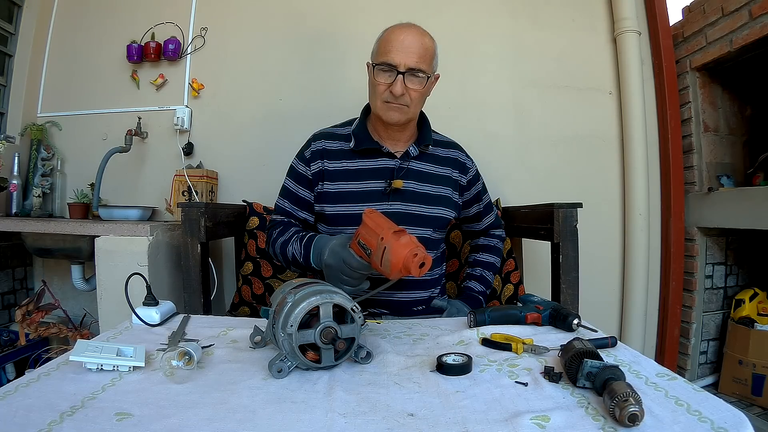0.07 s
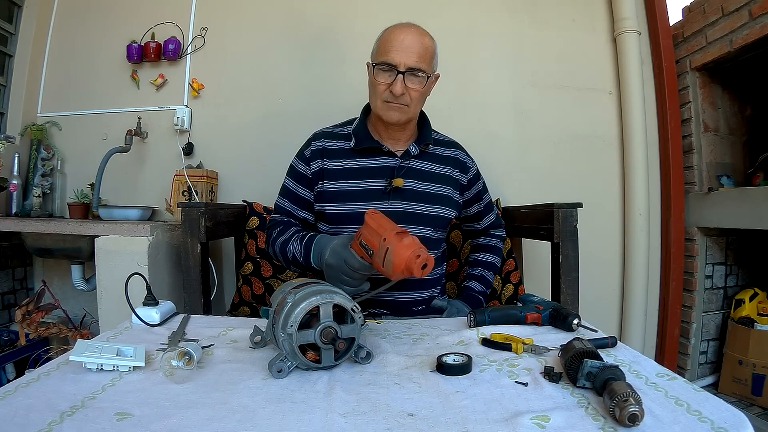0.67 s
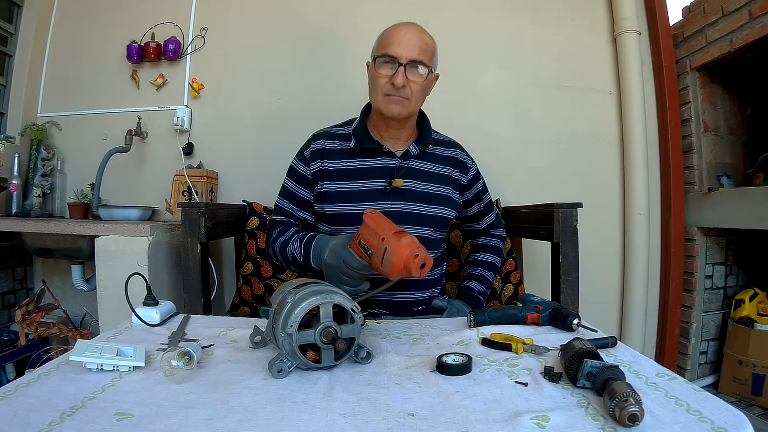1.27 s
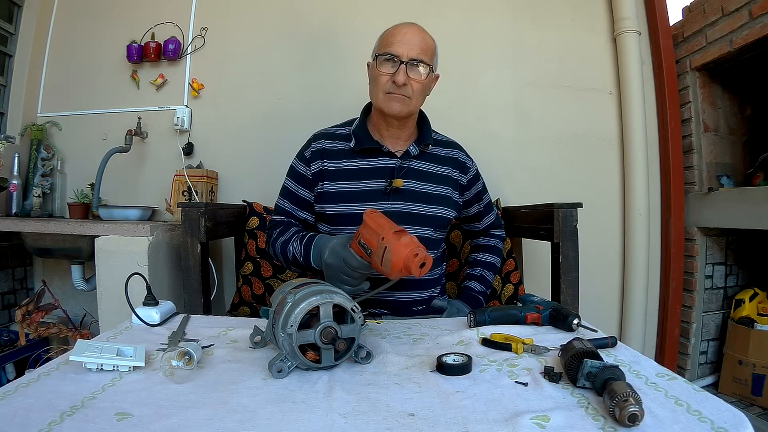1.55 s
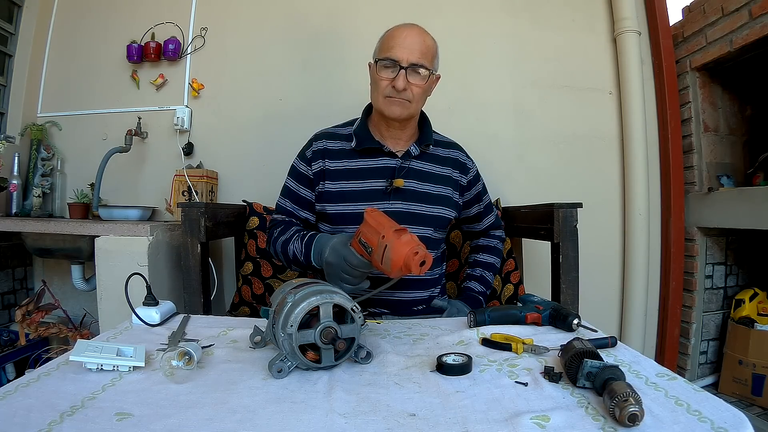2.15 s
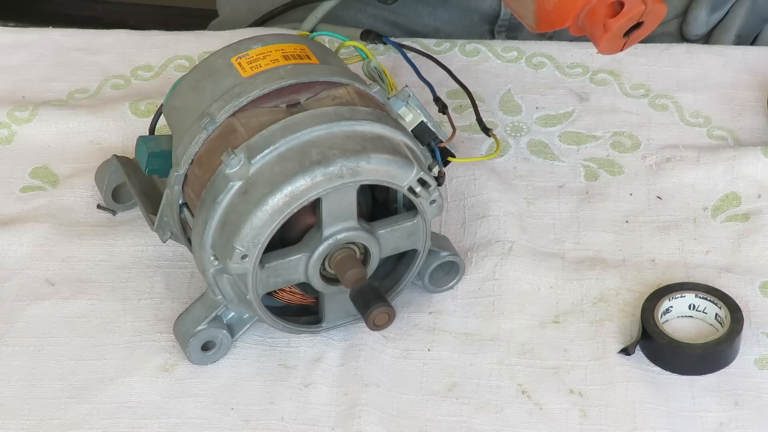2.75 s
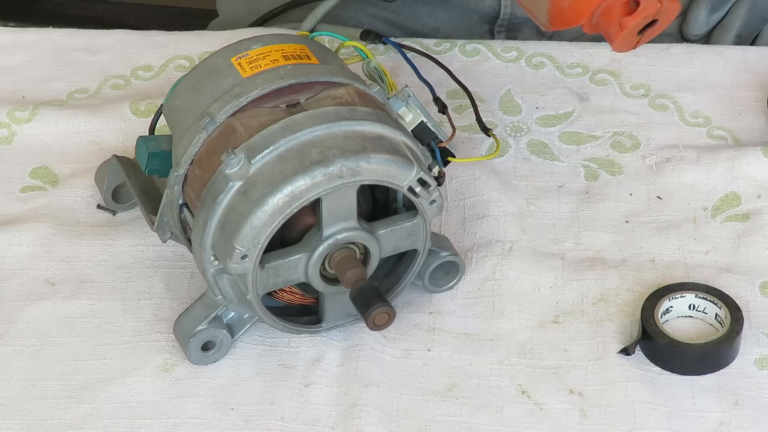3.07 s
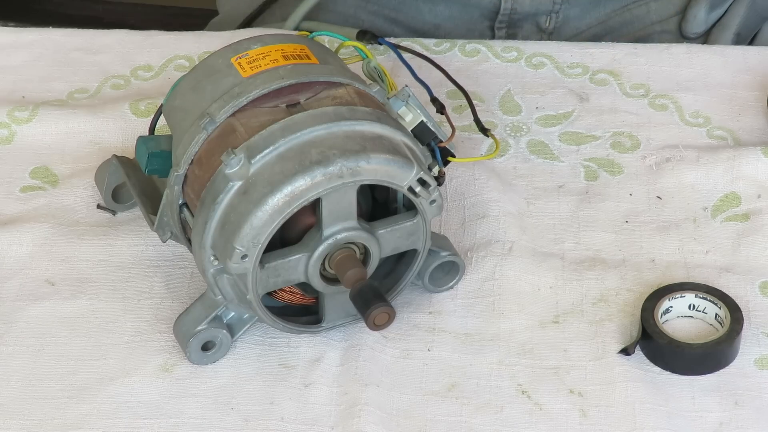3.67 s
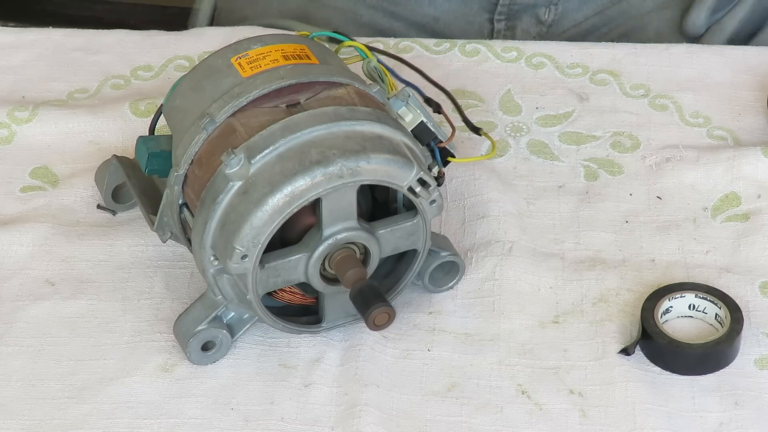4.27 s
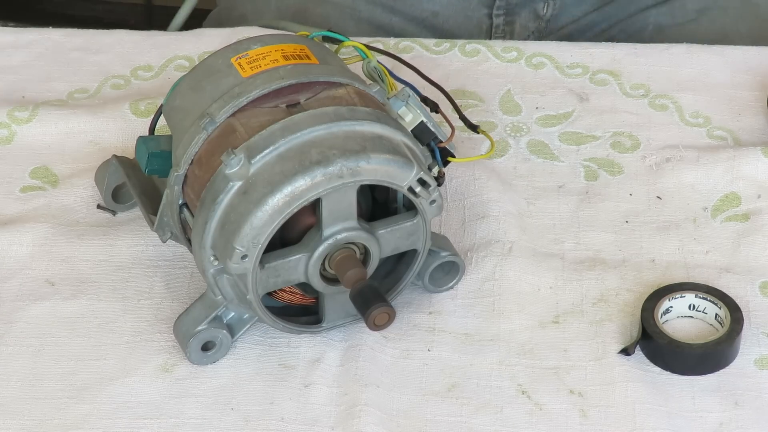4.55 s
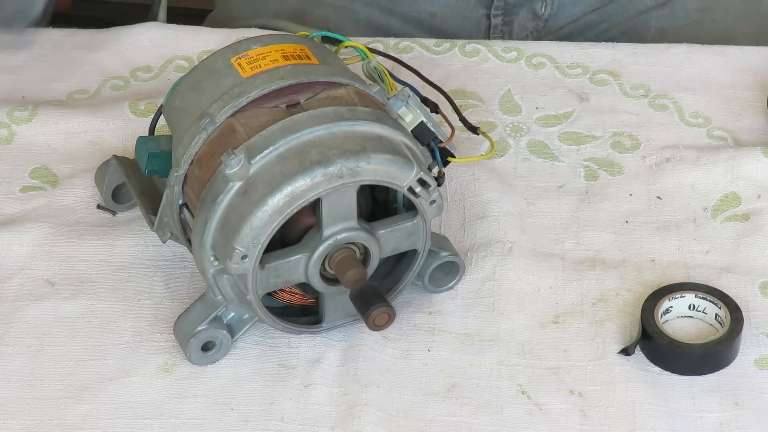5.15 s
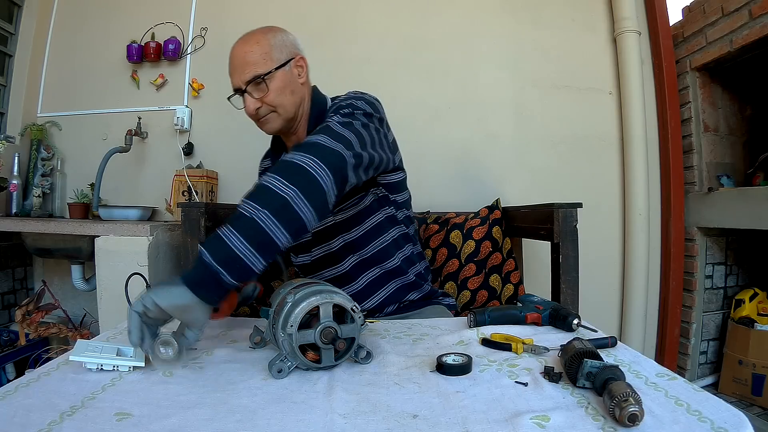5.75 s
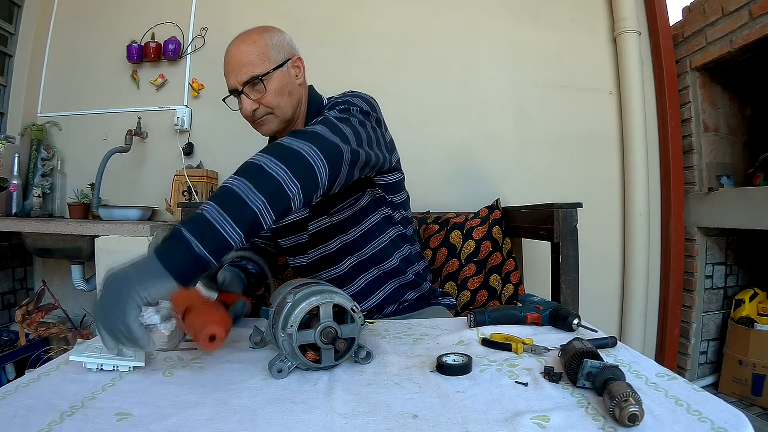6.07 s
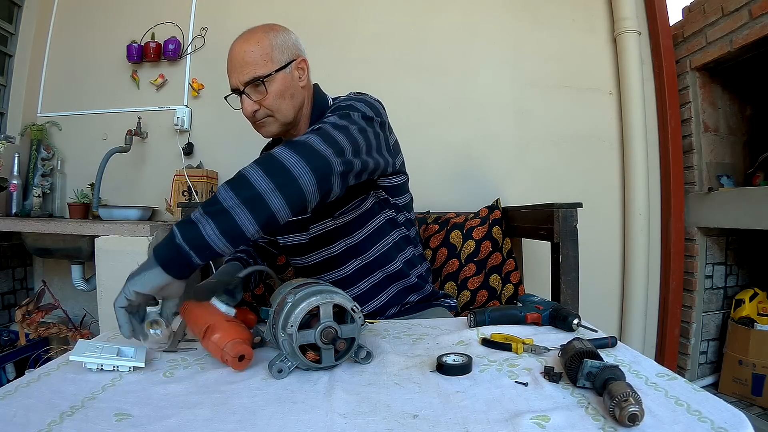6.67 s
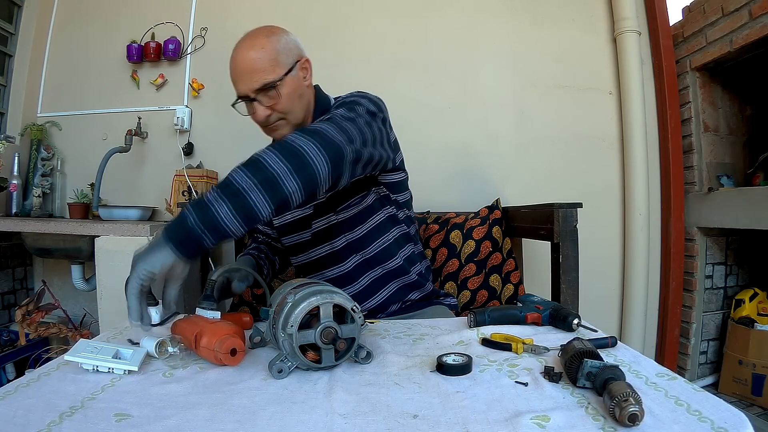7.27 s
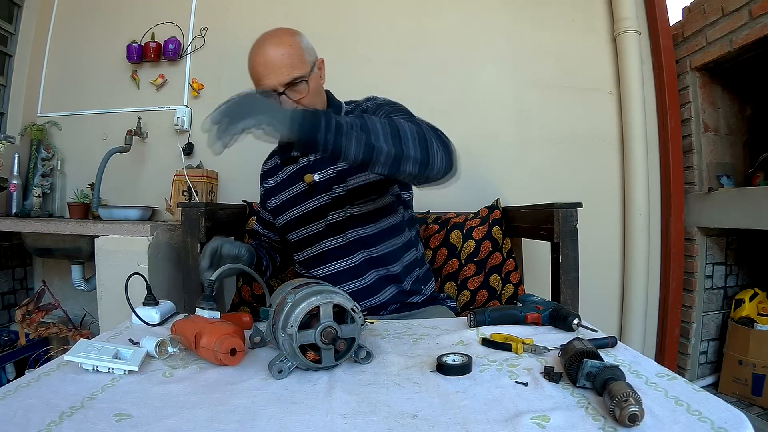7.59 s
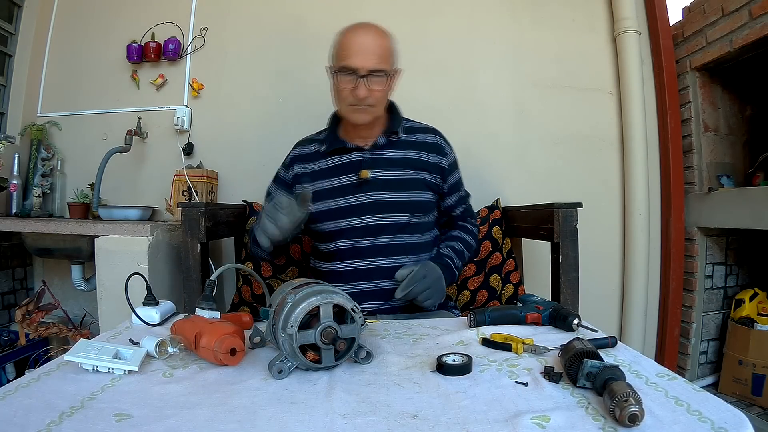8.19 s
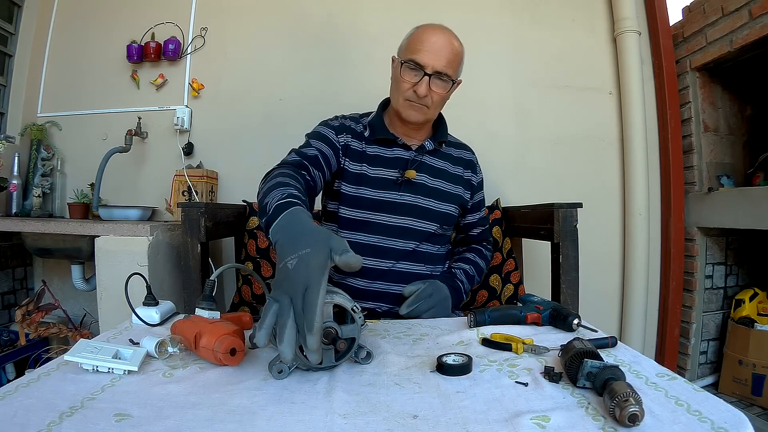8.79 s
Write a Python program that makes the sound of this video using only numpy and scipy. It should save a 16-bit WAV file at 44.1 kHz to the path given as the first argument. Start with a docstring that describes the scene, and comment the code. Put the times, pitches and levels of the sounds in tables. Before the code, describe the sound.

A bare washing-machine motor runs on a cloth-covered workbench, its hum and high whine rising in pitch over a hiss of bearings and brushes. After about three seconds the power cuts and it coasts, the pitch sinking slowly while the whirring grows raspier. A few dull knocks come as a power tool and a plug are handled on the bench. One close microphone picks it up.

```python
"""A hum and a rising whine, close by on one microphone: a bare brushed washing-machine motor running on
a cloth-covered workbench. It speeds up, loses its power at 2.8 s and coasts down. The unbalanced rotor
makes the bench hum, the brushes whine over 36 commutator bars, bearings and brushes hiss in the casing.
While it coasts, a power tool and a plug are handled on the bench with a few dull knocks."""
import sys
import numpy as np
from scipy import signal
from scipy.fft import rfft, irfft
from scipy.io import wavfile

SR = 44100
rng = np.random.default_rng(int(sys.argv[2]) if len(sys.argv) > 2 else 0)


def int16_out(signal):
    """Quantize to a 16-bit WAV file."""
    q = np.round(np.clip(np.atleast_2d(signal).T, -1, 1) * 32767)
    wavfile.write(sys.argv[1], SR, q.astype(np.int16))


N = 388962
TIME = np.arange(N) / SR
BIN_HZ = np.maximum(np.arange(N // 2 + 1) * SR / N, 1)
MAINS_HZ, POWER_OFF_S, BARS = 50, 2.82, 36

# stages of the speed: t/s, turn rate then/Hz, turn rate it heads for/Hz, time constant/s
LOW_POWER = (0, 168.8, 204.3, .824)
HIGH_POWER = (.6, 190.7, 334.2, 1.662)
COASTING = (POWER_OFF_S, 297.65, -106.2, 19.07)   # heads below zero: dry friction brakes even a slow rotor
# current in the windings while the power is on: t/s, share of full current
WINDING_CURRENT = [(0, 0.36), (.58, 0.2), (.64, 0.6), (1.3, 0.32), (2.1, 0.4), (2.75, 0.07)]
# unbalance shaking the bench once a turn: t/s, level/dB
UNBALANCE = [(0.0, -20.5), (0.1, -19.5), (0.22, -23.5), (0.66, -22.5), (0.76, -18), (1.08, -16.5),
             (1.2, -13), (2.09, -11), (3.22, -10.5), (4.3, -13.5), (4.59, -11), (4.86, -13.5), (5.28, -12),
             (6.41, -23.5), (7.1, -20), (7.61, -22), (7.86, -16), (8.82, -23)]
# response of feet and bench to rocking twice a turn: f/Hz, level/dB
ROCKING_RESPONSE = [(340, -38.5), (385, -37.5), (403, -46.5), (420, -34), (455, -36.5), (490, -37),
                    (508, -25), (516, -34), (528, -26), (543, -28.5), (553, -41.5), (569, -24.5),
                    (583, -29.5), (595, -23.5)]
# shaking at orders (multiples of the turn rate) 3 and 4:
# order, boost at full current/dB, [f/Hz, level against the low bearing noise/dB]
OVERTONES = [(3, 4.5, [(500, -23), (590, -15.5), (640, -9), (740, -7), (770, -13.5), (820, -5.5),
             (890, -3.5)]), (4, 10.5, [(670, -10), (800, -10.5), (870, -5.5), (1040, -7), (1100, -10),
             (1190, -5.5)])]
# weaker overtones of the shaking: order, level against the low bearing noise/dB
FAINT_OVERTONES = [(5, -12.5), (6, -40), (7, -14.5), (8, -15.5), (11, -25)]
# tones of the 18 rotor slots, the bars and their side tones, with the casing modes that each drives:
# order, dB gained per dB of chatter, [f/Hz, width/Hz, level at the hardest chatter/dB]
WHINE_TONES = [(13, 1.8, [(2815, 126, -33), (3330, 300, -37)]), (17, 0.51, [(3000, 160, -41),
               (3300, 160, -38), (4070, 140, -37), (4850, 350, -40)]), (18, 0.57, [(3150, 80, -37),
               (3290, 220, -39.5), (3840, 390, -37.5), (4190, 150, -38.5), (4500, 150, -47.5),
               (4897, 156, -29), (5220, 240, -30.5)]), (20, 0.91, [(3670, 200, -41), (4630, 190, -45),
               (5100, 280, -36.5), (5600, 180, -38)]), (27, 1.7, [(4950, 250, -46), (5580, 140, -41),
               (6220, 150, -36), (6650, 350, -44)]), (35, 0.89, [(8100, 170, -38), (9340, 430, -36),
               (10300, 300, -39)]), (36, 0.46, [(6630, 300, -36), (7440, 98, -31.5), (8180, 1100, -34),
               (8720, 250, -30.5), (9120, 230, -30.5), (9710, 170, -29.5), (10680, 100, -42)]),
               (37, 0.85, [(6820, 170, -35.5), (7690, 300, -33), (9000, 130, -34), (9510, 290, -35),
               (10850, 300, -37)]), (53, 1.3, [(12200, 800, -53), (13900, 300, -56)]),
               (55, 1.4, [(12600, 600, -60)]), (57, 1.4, [(12200, 800, -59)]),
               (70.8, 1, [(14000, 2500, -61)]), (72, .5, [(13400, 1500, -53), (14900, 600, -61)]),
               (73, 1, [(14000, 2500, -63)])]
# how hard the brushes chatter; they ride lightly around top speed and bite again at 4.1 s: t/s, level/dB
CHATTER_STRENGTH = [(0, -48), (.9, -42.5), (1.9, -50), (2.8, -55), (4.0, -56.5), (4.25, -41), (5.8, -37.5),
                    (6.3, -35), (7.1, -34.5), (8.82, -39)]
# chatter over uneven bars, most near multiples of the slot rate: order, relative level/dB
CHATTER_SPECTRUM = [(14, -7), (16, -6.5), (19, -12), (21.5, -10), (24, -17), (25, -19), (28, -14),
                    (34, -14.5), (42, -17.5), (45, -27.5), (48, -37), (59, -29)]
# balls passing flaws in the races: order, relative level/dB
BALL_TONES = [(13.9, -5), (21.3, -10)]
# resonances of the casing: f/Hz, width/Hz, gain/dB
CASING_MODES = [(2880, 88, -24), (3280, 130, -3.5), (3810, 440, 0), (4930, 490, -0.5), (5500, 230, 2),
                (6700, 350, -3.5), (7970, 770, 2), (9229, 860, 3.5), (13040, 990, 7.5), (14200, 900, -8)]
# colour of the rolling and rubbing noise: f/Hz, relative level/dB
FRICTION_SPECTRUM = [(300, -8), (550, -0.5), (850, 2.7), (1150, -4), (1450, -1.5), (1950, -7.5),
                     (2450, -12.5), (3250, -5), (4350, -14.5), (5000, -12.5), (7500, -23.5), (9600, -29.5),
                     (11200, -36), (15500, -43.5)]
# friction before the band gains: t/s, low bearing/dB, high bearing/dB, end-shield ring/dB, brush rub/dB
FRICTION_LEVELS = [(0.0, -37, -36.5, -40.5, -42), (0.47, -36, -36, -38.5, -44),
                   (0.81, -34.5, -32.5, -36.5, -44.5), (1.08, -32, -32.5, -36, -42.5),
                   (1.5, -31.5, -30, -32, -37.5), (1.94, -29.5, -28, -29.5, -36),
                   (2.46, -31.5, -31.5, -32.5, -39.5), (2.82, -32, -31, -32, -39),
                   (3.61, -32, -31.5, -32.5, -40), (4.1, -29.5, -29.5, -31, -34),
                   (4.3, -28.5, -26.5, -29.5, -32.5), (5.26, -29.5, -27.5, -32, -33.5),
                   (5.65, -27.5, -29, -28, -32.5), (6.34, -29.5, -28.5, -27, -32.5),
                   (7.0, -28, -29.5, -27.5, -34.5), (8.11, -32.5, -31.5, -33.5, -37.5),
                   (8.4, -32, -32.5, -32.5, -35), (8.82, -32.5, -32, -36.5, -38)]
FRICTION_GAINS_DB = (-0.5, -0.5, -2, -3.5)
FRICTION_EDGES_HZ = (150, 1100, 2400, 4200, 6500, 17000)   # those four bands, then the brush hiss
# things set down on the bench: t/s, peak level/dB, contact cut-off/Hz
KNOCKS = [(4.735, -34, 80), (4.76, -35, 100), (6.235, -35, 250), (6.468, -24, 200), (6.497, -29, 200),
          (7.356, -33, 400), (7.385, -34, 250)]
# modes of the bench: f/Hz, relative level/dB, t60/s
BENCH_MODES = [(55, -12, .2), (112, -1.5, 0.12), (148, -3.5, 0.18), (177, 7.5, .25), (260, -6, .12),
               (332, 10, .12)]


def from_db(db):
    """Decibels to gain."""
    return np.exp(np.asarray(db) * (np.log(10) / 20))


def unit_rms(x):
    """Scale to an rms of 1."""
    return x / np.sqrt(np.mean(x ** 2) + 1e-20)


def in_time(rows):
    """One curve per column, straight between the rows."""
    times, *columns = np.transpose(rows)
    return [np.interp(TIME, times, column) for column in columns]


def spectrum_db(points, hz):
    """Read a spectrum in dB on a log-frequency axis."""
    known_hz, db = np.transpose(points)
    return np.interp(np.log(hz), np.log(known_hz), db)


def noise(gain):
    """Noise of rms 1, shaped by a gain per frequency bin."""
    return unit_rms(irfft(rfft(rng.standard_normal(N)) * gain, N))


def drift(rate):
    """A random wander of rms 1 with about `rate` swings a second."""
    grid = np.linspace(0, N / SR, 4096)
    hz = np.arange(len(grid) // 2 + 1) / grid[-1]
    slow = irfft(rfft(rng.standard_normal(len(grid))) / (1 + (hz / rate) ** 2))
    return np.interp(TIME, grid, unit_rms(slow))


def tone(angle, order):
    """A sine of rms 1 locked to the rotor, `order` cycles a turn."""
    cycles = order * angle / (2 * np.pi) + rng.random()
    return np.sqrt(2) * np.sin(2 * np.pi * cycles)


def resonance_gain(modes, hz):
    """A body radiates best near its resonances; their powers add."""
    grid = np.geomspace(100, SR / 2, 4000)
    power = sum(from_db(db) ** 2 / (1 + (2 * (grid - centre) / width) ** 2) for centre, width, db in modes)
    return np.interp(hz, grid, np.sqrt(power))


def reflections(x, wet_db, t60):
    """Bench and walls reflect to the microphone; gliding tones swell and fade in their standing waves."""
    t = TIME[:SR // 2]
    tail = rng.standard_normal(len(t)) * from_db(-60 * t / t60) * (t > .002)
    wet = signal.fftconvolve(x, tail / np.linalg.norm(tail))[:N]
    return (x + from_db(wet_db) * wet) / np.hypot(1, from_db(wet_db))


def rotor_speed():
    """Turns per second: the rotor gathers speed on low, then high power, until it is left to coast."""
    low, high, coast = (end_hz + (from_hz - end_hz) * np.exp((start_s - TIME) / lag_s)
                        for start_s, from_hz, end_hz, lag_s in (LOW_POWER, HIGH_POWER, COASTING))
    return np.minimum(np.maximum(low, high), coast)


def rotor_angle(turn_hz, current, driven_rad, coasting_rad):
    """The shaft turns smoothly when coasting and flutters a little under torque."""
    flutter = (coasting_rad + driven_rad * current) * drift(rate=54)
    return 2 * np.pi * np.cumsum(turn_hz) / SR + flutter


def bench_hum(angle, turn_hz, current, bearing_db):
    """The unbalanced rotor rocks the motor on the bench: a strong hum with wavering overtones."""
    hum = from_db(in_time(UNBALANCE)[0] + 0.32 * drift(rate=13.5)) * tone(angle, 1)
    tool_db = 11.5 * np.exp(-((TIME - 6.33) / 0.8) ** 2)   # a swell as the power tool is laid on the bench
    torque_db = 3 * current
    rocking_db = spectrum_db(ROCKING_RESPONSE, 2 * turn_hz) + tool_db + torque_db
    rocking = from_db(rocking_db + 1.76 * drift(rate=6.6)) * tone(angle, 2)
    overtones = 0
    for order, driven_db, response in OVERTONES:
        level_db = bearing_db + spectrum_db(response, order * turn_hz) + driven_db * current
        overtones += from_db(level_db + 2.03 * drift(rate=11)) * tone(angle, order)
    faint = sum(from_db(bearing_db + db) * tone(angle, order) for order, db in FAINT_OVERTONES)
    return hum + rocking + overtones + reflections(faint, wet_db=6, t60=0.4)


def mains_hum(current, hum_db, buzz_db):
    """The stator iron is pulled twice a mains cycle; on low power a third harmonic joins in."""
    phase = 2 * np.pi * MAINS_HZ * TIME
    low_power = np.interp(TIME, [.55, .65], [1, 0])
    return from_db(hum_db) * current * np.sin(2 * phase) + from_db(buzz_db) * low_power * np.sin(3 * phase)


def whine(angle, turn_hz, current, contact_db, waver_db, ripple):
    """Slot and bar tones glide through the casing's modes; the mains current ripples their strength."""
    tones = 0
    for order, db_per_db, modes in WHINE_TONES:
        order = round(order)
        strength = from_db(db_per_db * contact_db + waver_db * drift(rate=17))
        tones += resonance_gain(modes, order * turn_hz) * strength * tone(angle, order)
    pulsing = 1 + ripple * current * np.sin(4 * np.pi * MAINS_HZ * TIME)
    return reflections(tones * pulsing, wet_db=-16.5, t60=0.074)


def chatter(angle, turn_hz, level_db, contact_db, dulling, uneven_db):
    """Brushes ride uneven bars, balls pass flaws: a comb of tones gliding through the casing's modes."""
    orders = np.setdiff1d(np.arange(14, 60), [round(row[0]) for row in WHINE_TONES])
    orders_db = spectrum_db(CHATTER_SPECTRUM, orders) + uneven_db * rng.standard_normal(len(orders))
    comb = 0
    for order, db in list(zip(orders, orders_db)) + BALL_TONES:
        # a lighter contact loses its highest tones first
        tilt_db = dulling * np.clip(order / BARS - 1, 0, .5) * contact_db
        comb += from_db(db + tilt_db) * resonance_gain(CASING_MODES, order * turn_hz) * tone(angle, order)
    return reflections(comb * from_db(level_db), wet_db=-8, t60=.025)


def friction_levels(turn_hz):
    """Five band levels in dB; the brush hiss lies further under the rub the faster the rotor turns."""
    levels_db = in_time(FRICTION_LEVELS)
    hiss_db = levels_db[-1] - 7 - 7 * np.log2(turn_hz / turn_hz.mean())
    return [db + gain_db for db, gain_db in zip(levels_db, FRICTION_GAINS_DB)] + [hiss_db]


def friction(angle, levels_db, throb, flicker_db):
    """Rolling balls and sliding carbon excite the casing's resonances, a little harder once a turn."""
    colour = from_db(spectrum_db(FRICTION_SPECTRUM, BIN_HZ))
    out = 0
    for low_hz, high_hz, db in zip(FRICTION_EDGES_HZ, FRICTION_EDGES_HZ[1:], levels_db):
        skirt = 5 if low_hz == FRICTION_EDGES_HZ[0] else 16   # the lowest band fades gently into the bass
        band = 1 / np.sqrt((1 + (low_hz / BIN_HZ) ** skirt) * (1 + (BIN_HZ / high_hz) ** 16))
        out += from_db(db + flicker_db * drift(rate=18)) * noise(colour * band)
    return out * (1 + throb * np.sin(angle))


def room_tone(level_db, corner_hz):
    """A faint, steady rumble from the surroundings."""
    return from_db(level_db) * noise(1 / (1 + (BIN_HZ / corner_hz) ** 2))


def knocks():
    """Blows softened by the cloth set the bench's low modes ringing."""
    out, t = np.zeros(N), TIME[:SR // 2]
    for start_s, peak_db, soft_hz in KNOCKS:
        thud = 0
        for hz, db, t60 in BENCH_MODES:
            decay = from_db(db + rng.normal(0, 1.8) - 60 * t / t60)
            thud += decay / (1 + (hz / soft_hz) ** 2) * np.sin(2 * np.pi * hz * t)
        thud *= 1 - np.exp(-t / 0.0051)   # soft onset
        start = round(start_s * SR)
        out[start:start + len(t)] += from_db(peak_db) * thud / np.abs(thud).max()
    return out


def scene():
    """At the bench, in mono: the motor over faint room tone, then the knocks."""
    turn_hz = rotor_speed()
    current = in_time(WINDING_CURRENT)[0] * (TIME < POWER_OFF_S)
    angle = rotor_angle(turn_hz, current, driven_rad=0.015, coasting_rad=.004)
    bands_db = friction_levels(turn_hz)
    chatter_db = in_time(CHATTER_STRENGTH)[0]
    contact_db = chatter_db - chatter_db.max()   # 0 where the brushes bite hardest
    bars = whine(angle, turn_hz, current, contact_db, waver_db=2.0, ripple=0.3)
    brushes = chatter(angle, turn_hz, chatter_db, contact_db, dulling=0.43, uneven_db=4.3)
    rubbing = friction(angle, bands_db, throb=0.091, flicker_db=.5)
    shaking = bench_hum(angle, turn_hz, current, bearing_db=bands_db[0])
    motor = shaking + mains_hum(current, hum_db=-42, buzz_db=-45) + bars + brushes + rubbing
    return (motor + knocks() + room_tone(level_db=-62.5, corner_hz=110))[None]


def record(dry):
    """The sound dips twice for a few milliseconds; the top is cut at 15750 Hz."""
    gain = np.ones(N)
    for dip_s in (2.3995, 5.4692):
        gain *= np.clip(np.abs(TIME - dip_s) / 0.0063, .08, 1)
    top_cut = 1 / np.sqrt(1 + (BIN_HZ / 15750) ** 400)
    return irfft(rfft(dry * gain) * top_cut, N)


dry = scene()
out = record(dry)
int16_out(out)
```